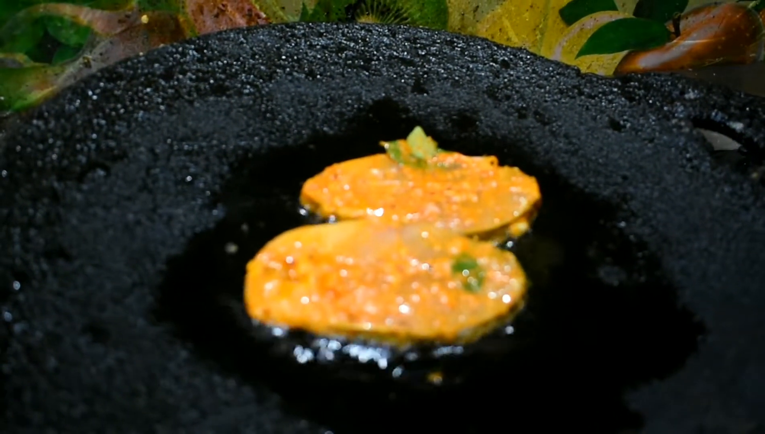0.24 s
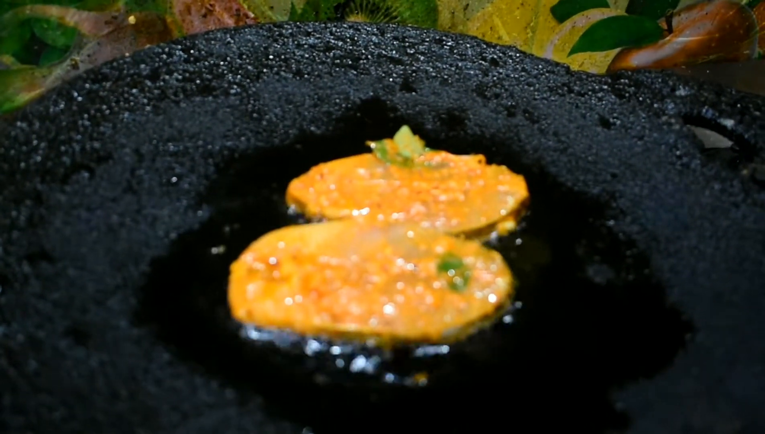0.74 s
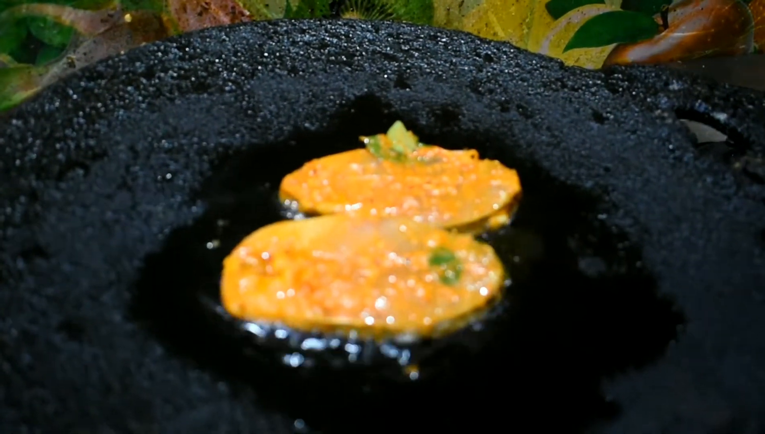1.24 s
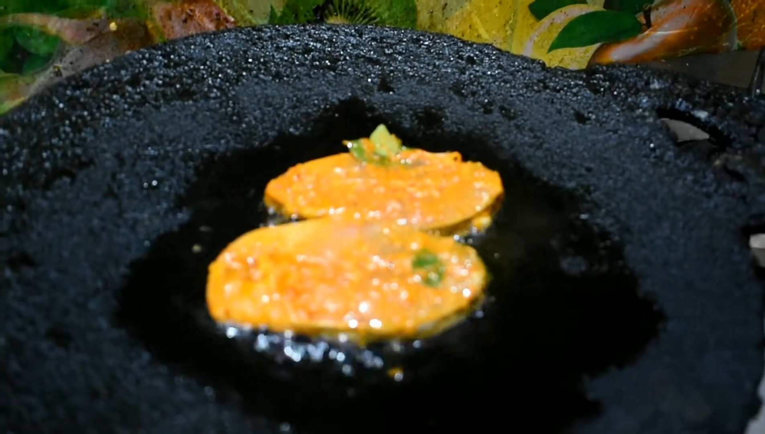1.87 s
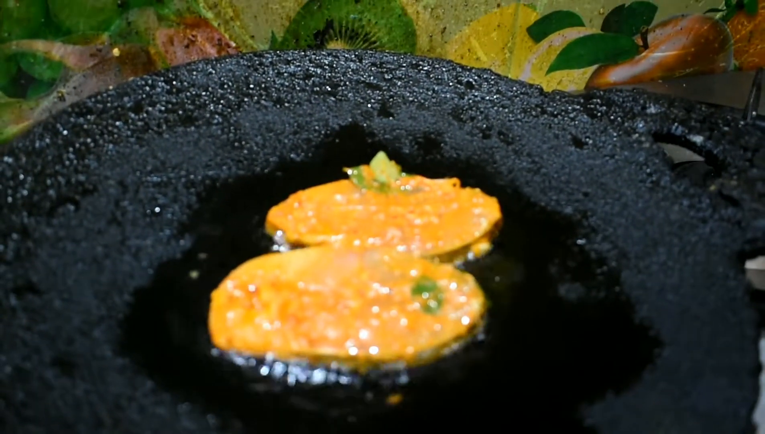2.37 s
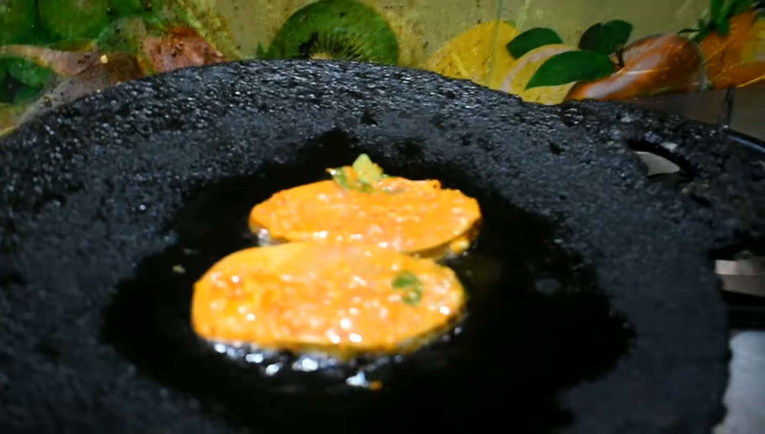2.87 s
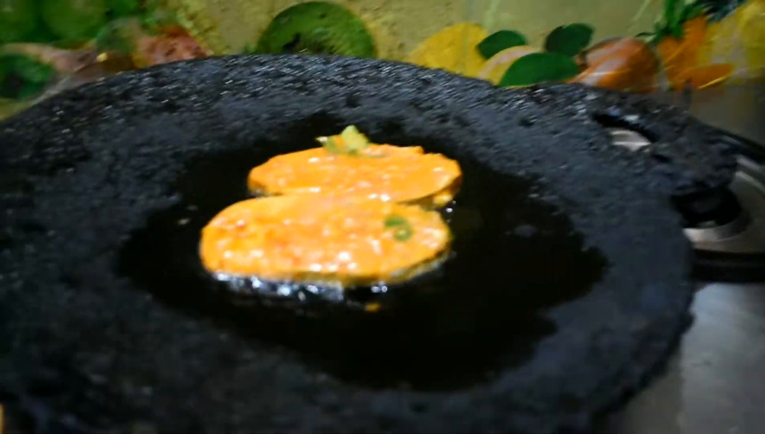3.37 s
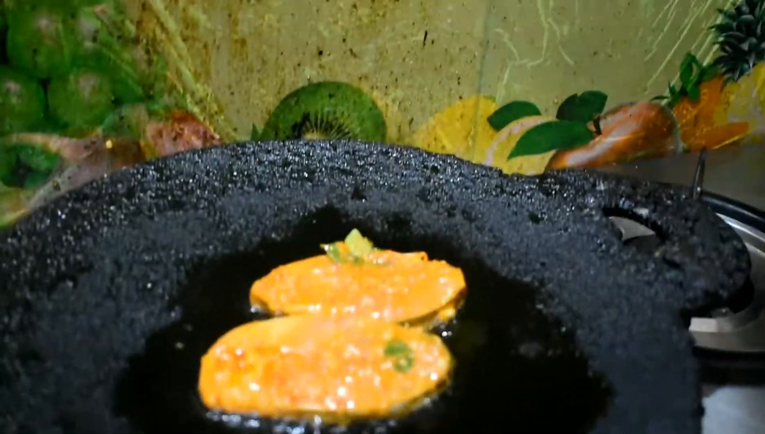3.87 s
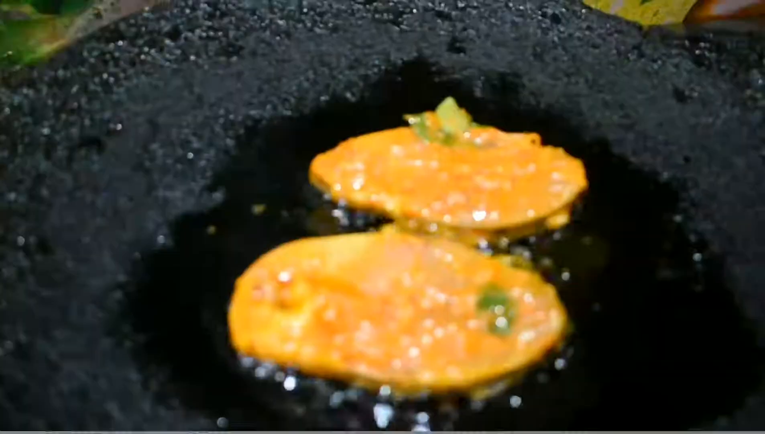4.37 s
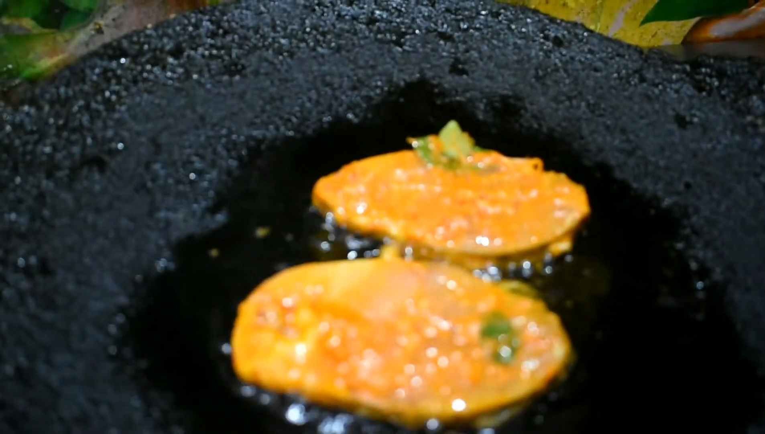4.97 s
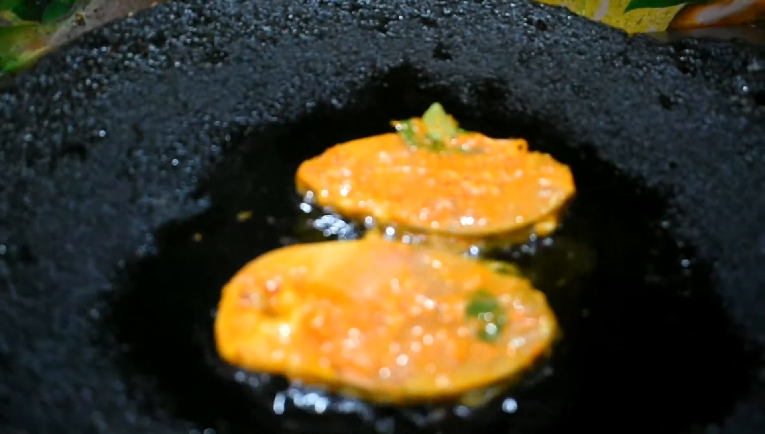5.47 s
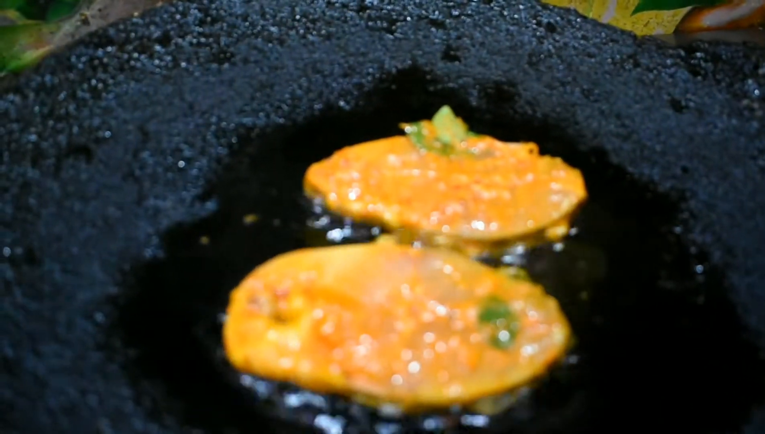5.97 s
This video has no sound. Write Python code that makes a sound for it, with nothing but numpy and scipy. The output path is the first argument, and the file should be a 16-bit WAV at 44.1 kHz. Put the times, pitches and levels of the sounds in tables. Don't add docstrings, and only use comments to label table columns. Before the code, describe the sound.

Close sizzling and crackling of fish frying in oil, with a hard spit and thump early on, then a cut to a fiercer, nearer fry.

```python
import sys
import numpy as np
from scipy import signal
from scipy.fft import rfft, irfft
from scipy.io import wavfile
from scipy.ndimage import minimum_filter1d

SR = 44100
rng = np.random.default_rng(int(sys.argv[2]) if len(sys.argv) > 2 else 0)


def to_wav(sig):
    pcm = np.clip(np.atleast_2d(sig), -1, 1) * 32767
    pcm = np.round(pcm).astype(np.int16)
    wavfile.write(sys.argv[1], SR, pcm.T)


def gain_from_db(level_db):
    decades = np.asarray(level_db, float) / 20
    return 10 ** decades


N = 274302
T = np.arange(N) / SR
TURN_S, CUT_S = 2.9, 4.436
NEAR = T > CUT_S


def rms_one(x):
    return x / np.sqrt(np.mean(x ** 2) + 1e-20)


def curve(x, table):
    return np.interp(x, *np.transpose(table))


def colour(x, spectrum):
    hz, db = np.transpose(spectrum)
    grid = np.fft.rfftfreq(4096, 1 / SR) + 1
    gain_db = np.interp(np.log(grid), np.log(hz), np.maximum(db, -70))
    cepstrum = irfft(np.log(gain_from_db(gain_db)))
    cepstrum[1:2048] *= 2
    cepstrum[2049:] = 0
    return signal.fftconvolve(x, irfft(np.exp(rfft(cepstrum))))[:N]


def resonance(x, hz, width_hz):
    r = np.exp(-np.pi * width_hz / SR)
    zeros = np.array([1, 0, -1]) * (1 - r * r) / 2
    return signal.lfilter(zeros, [1, -2 * r * np.cos(2 * np.pi * hz / SR), r * r], x)


def butter(x, order, hz, kind):
    return signal.sosfilt(signal.butter(order, hz, kind, fs=SR, output="sos"), x)


def drift(rate_hz):
    r = np.exp(-2 * np.pi * rate_hz / SR)
    return rms_one(signal.lfilter([1], [1, -2 * r, r * r], rng.standard_normal(N + SR))[SR:])


def between(start_s, length_s, edge_s):
    t = T - start_s
    return np.clip(np.minimum(t, length_s - t) / edge_s + .5, 0, 1)


def off_the_pan(x, lag_s, echo_db):
    lag = int(lag_s * SR)
    return x + gain_from_db(echo_db) * np.concatenate([np.zeros(lag), x[:-lag]])


def kitchen(x, wet_db, t60_s, count=8):
    t = np.arange(SR // 5) / SR
    tails = rng.standard_normal((count, len(t))) * gain_from_db(-60 * t / t60_s) * (t > .002)
    turn = (np.arange(N) / (.006 * SR)) % count
    wet = np.zeros(N)
    for k, tail in enumerate(tails):
        apart = np.abs((turn - k + count / 2) % count - count / 2)
        spot = x * np.cos(np.pi / 2 * np.minimum(apart, 1)) / np.sqrt(np.sum(tail ** 2))
        near, far = (signal.oaconvolve(spot * view, tail)[:N] for view in (NEAR, ~NEAR))
        wet += np.where(NEAR, near, far)
    return x + gain_from_db(wet_db) * wet


# start_s, length_s, rise_db
FLARES = [
    (2.84, 0.73, 12),
    (4.082, 0.27, 11.5),
]


def flame_level(fade_db):
    level_db = np.where(NEAR, -66, -70.5) + fade_db + 2.5 * drift(3)
    for start_s, length_s, rise_db in FLARES:
        level_db = level_db + rise_db * between(start_s, length_s, edge_s=0.08)
    return level_db


# pitch_hz, width_hz, level_db
BURNER = [(107.3, 27, -5), (131.2, 30, -6.5), (256, 45, -3.5), (320, 24, -8)]


def flame(level_db):
    noise = rng.standard_normal(N)
    murmur = sum(gain_from_db(db) * resonance(resonance(noise, hz, width), hz, 2 * width) for hz, width, db in BURNER)
    return gain_from_db(level_db) * rms_one(murmur)


# start_s, level_db
VIGOUR_FAR = [(0, -28.5), (0.25, -30.5), (1.2, -30.5), (1.5, -31), (2.1, -29.5), (2.8, -30.5), (3.2, -29),
              (3.9, -30), (4.43, -30)]
# start_s, level_db
VIGOUR_NEAR = [(4.44, -29.5), (4.95, -27), (5.2, -24), (5.55, -26), (5.85, -25), (6.22, -26.5)]


def vigour(fade_db):
    return curve(T, VIGOUR_FAR + VIGOUR_NEAR) + fade_db


def bubbles(per_s, spread_db, largest, sharpness, clump_db, lowest_hz, count=26):
    luck = rng.random(N)
    clumps = gain_from_db(clump_db * (drift(12) + .7 * drift(70)))
    born = luck < per_s * clumps / SR
    sizes = born * gain_from_db(spread_db * np.minimum(rng.exponential(1, N), largest)) * rng.choice([-1, 1], N)
    pitches = np.geomspace(lowest_hz, 16000, count)
    dealt = rng.choice(count, N, p=pitches / pitches.sum())
    lags = rng.uniform(.0007, .0011, count)
    out = np.zeros(N)
    for k, (hz, lag) in enumerate(zip(pitches, lags)):
        ring = resonance(sizes * (dealt == k) + 1e-18, hz, hz / sharpness)
        out += off_the_pan(ring, lag, -4)
    return rms_one(out)


# pitch_hz, level_db (per Hz)
OIL_COLOUR = [
    [(120, -22.5), (200, -18), (334, -10), (734, -7), (949, -5.5), (2050, -4.5), (2700, -3), (8700, -7),
     (11000, -11), (14500, -36), (15900, -37.5)],
    [(120, -58), (200, -21.5), (734, -7.5), (932, -5.5), (1500, -3), (2650, -1.5), (4180, -4), (8550, -6),
     (10100, -7), (14800, -29.5), (15900, -52)],
]
# pitch_hz, width_hz, level_db
PAN_MODES = [(955.5, 7.5, -12.5), (2670, 210, -31.5), (8240, 610, -41)]


def sizzle(level_db):
    hiss = rng.standard_normal(N) * gain_from_db(2.34 * drift(9.3) + 0.19 * drift(71))
    fizz = bubbles(per_s=5000, spread_db=4.0, largest=3.15, sharpness=2.8, clump_db=4.0, lowest_hz=301.8)
    crackle = bubbles(per_s=500, spread_db=6.0, largest=1.9, sharpness=3.0, clump_db=3.0, lowest_hz=1700)
    white = gain_from_db(-7) * hiss + gain_from_db(-5.0) * fizz + gain_from_db(1) * crackle
    white = white + sum(gain_from_db(db + 19.5) * resonance(white, hz, width) for hz, width, db in PAN_MODES)
    far, near = (rms_one(colour(white, view)) for view in OIL_COLOUR)
    oil = np.where(NEAR, near, far)
    top = butter(oil, 4, 11000, "high")
    top_db = np.where(NEAR, 2, np.where(T > TURN_S, -3, -1))
    return gain_from_db(level_db + 0.5) * (oil + (gain_from_db(top_db) - 1) * top)


def medium_bursts(level_db, count=600):
    when, keep, size, kind, tune = rng.random((count, 5)).T
    at = (when * (N - 1)).astype(int)
    start_s = when * N / SR
    here_db = level_db[at]
    small = kind < 0.75
    turned = small & (start_s > TURN_S) & (start_s < CUT_S)
    flurry_db = 5 * (drift(7)[at] - .3)
    per_s = 22 * gain_from_db(0.99 * (here_db + 30) + flurry_db) * np.where(turned, 1.8, 1)
    kept = keep * count * SR / N < per_s
    hz = np.where(small, 9240 * (1 + 0.43 * (tune - .5)), 4600 * (1 + 0.7 * (tune - .5)))
    db = here_db + 19.5 - 5 * size + 5.5 * turned - 6.5 * ~small
    audible = kept & (db > -100)
    return list(zip(start_s[audible], db[audible], hz[audible]))


# start_s, level_db (peak), pitch_hz
SNAPS_FAR = [(0.1033, -5, 8550), (0.4502, -4, 7400), (0.4928, -3, 5800), (0.5843, -7.5, 9040),
             (0.9261, -7.5, 8900), (1.0151, -7.5, 9200), (1.0486, -7.5, 6850), (1.1324, -3, 6100),
             (1.361, -8, 7040), (1.6626, 6, 8730), (1.6645, -2.5, 8550), (1.7266, -4.5, 10300),
             (2.0581, -3.5, 9700), (2.1677, -7, 10500), (2.4394, -3.5, 8400), (2.6395, -8.5, 7800),
             (2.8367, -3.5, 8900), (2.9778, -8, 10300), (3.4483, -8.5, 5370), (3.517, -6.5, 9330),
             (3.5918, -5.5, 9900), (3.6548, -2, 9200), (3.79, -7, 9200), (3.8122, -1, 8240),
             (3.9185, -5.5, 10340), (3.941, -3.5, 9860), (4.0087, -4.5, 9000), (4.143, -3.5, 8660),
             (4.3078, -5.5, 7900), (4.3954, -7, 8410)]
# start_s, level_db (peak), pitch_hz
SNAPS_NEAR = [(4.6968, -13.5, 7740), (4.7374, -8.5, 9150), (4.7911, -7, 7900), (4.833, -7.5, 8750),
              (4.85, -6, 9200), (4.9041, -5, 9750), (4.9766, -9, 10800), (4.9862, 0.5, 9340),
              (5.0008, -2.5, 6670), (5.1902, -7, 6500), (5.1408, 1, 7870), (5.154, -3, 6060),
              (5.2381, 1, 8450), (5.2618, -4, 7850), (5.286, -11, 7720), (5.3797, -0.5, 8540),
              (5.4674, -3.5, 6760), (5.5258, -2, 8370), (5.5778, -1, 7340), (5.5811, -4, 8160),
              (5.5842, 0.5, 6460), (5.6403, -3, 5900), (5.6792, -7, 7500), (5.777, -9.5, 7320),
              (5.79, -1.5, 7640), (5.8605, -7, 7940), (5.9995, -11, 8800), (6.035, -7, 8750),
              (6.1327, -2, 7900), (6.1346, -5.5, 9100)]
# start_s, level_db (peak), pitch_hz
POPS = [(0.0971, -7, 4200), (0.4084, -7.5, 5100), (0.7692, -14, 4100), (1.1628, -11.5, 2640),
        (1.1904, -16, 2850), (2.0072, -13.5, 4070), (2.1867, -14.5, 3300), (2.5362, -11, 3920),
        (2.9562, -13.5, 4310), (3.2349, -11, 4330), (3.2758, -10, 3040), (3.5207, -10, 4800),
        (3.26, -21, 4400), (3.824, -21, 3170), (3.846, -10, 4350), (4.4239, -7.5, 4600),
        (4.6228, -21, 4970), (4.918, -12.5, 2530), (4.9628, -17, 2670), (4.9887, -7.5, 3500),
        (5.14, -10, 3730), (5.144, -2.5, 5400), (5.438, -15, 2700), (5.573, -6, 3760), (5.6082, -1.5, 3860),
        (5.7748, -9.5, 4900), (6.03, -2.5, 4820), (6.0408, -10, 4800), (6.0876, -7.5, 6600),
        (6.1744, -6, 5000)]


def bursts(level_db, spray_db=-25, spray_t60_s=0.0062):
    rows = SNAPS_FAR + SNAPS_NEAR + POPS + medium_bursts(level_db)
    out, t = np.zeros(N + 900), np.arange(900) / SR
    chance, spray = rng.random((400, 4)), rng.standard_normal((400, 900))
    for (s, db, hz), (u, v, w, p), noise in zip(rows, chance, spray):
        ring_ms = 0.12 + 1000 * 2.1 / hz
        fade_s = .85 * max(ring_ms - .13, .06) / 1000
        ring = np.sin(2 * np.pi * hz * t * (1 + 0.01 * t / fade_s))
        ring *= (1 - np.exp(-t / 5e-5)) * np.exp(-t / fade_s)
        snap = gain_from_db(-2) * np.exp(-t / 6e-5) * np.sin(2 * np.pi * (6000 + 8000 * u) * t)
        pop = off_the_pan((ring + snap) * np.sign(p - .5), .0008 + .00022 * w, -2 - 5 * v)
        pop += gain_from_db(spray_db) * noise * gain_from_db(-60 * t / spray_t60_s)
        at = round(s * SR)
        out[at:at + len(t)] += gain_from_db(db + 5.5) * pop
    return butter(butter(out[:N], 2, 1300, "high"), 3, 12500, "low")


# start_s, level_db (peak), pitch_hz, length_cycles
SPITS = [(0.0972, -1, 7900, 1.9), (1.6626, -1, 6300, 22), (1.6630, -1, 11200, 22), (1.6635, -24, 690, 2.1),
         (1.675, -25, 1000, 5), (2.0818, -15, 2580, 9.5), (3.5578, -7, 2290, 9.1), (3.5582, -7.5, 3250, 19),
         (3.5755, -7, 1910, 1.9), (4.7, -8, 2300, 7.7), (4.4239, -7, 940, 1.9), (4.4241, -3, 3020, 11.4),
         (4.4248, -17.5, 304, 4.2), (5.0905, -6, 7300, 11)]
# start_s, level_db (peak)
JOLTS = [
    (0.1, -39),
    (1.6652, -16.5),
    (5.143, -29),
    (5.237, -38),
    (5.586, -26.5),
    (5.6114, -30.5),
]


def spits(jolt_s=0.00092):
    out, t = np.zeros(N + 2000), np.arange(2000) / SR
    for s, db, hz, cycles in SPITS:
        ring = -gain_from_db(db - 60 * t * hz / (2 * cycles)) * np.sin(2 * np.pi * hz * t)
        heard = (s + t < CUT_S) | (s > CUT_S)
        out[round(s * SR):][:len(t)] += heard * butter(ring, 2, hz / 2.5, "high")
    for s, db in JOLTS:
        out[round(s * SR):][:len(t)] -= gain_from_db(db) * np.sin(np.pi * np.minimum(t / jolt_s, 1)) ** 2
    return out[:N]


# start_s, level_db
SPLICE = [(5.03, 0), (5.06, -3), (5.095, -3), (5.099, -22), (5.1027, -22), (5.1042, 2), (5.16, 0)]


def scene():
    fade_db = NEAR * np.clip(-22.5 + 94.5 * np.maximum(T - CUT_S - 0.038, 0), None, 0)
    level_db = vigour(fade_db)
    flame_db = flame_level(fade_db)
    oil = kitchen(sizzle(level_db) + bursts(level_db), wet_db=-7.5, t60_s=0.16)
    mono = oil + spits() + flame(flame_db)
    far_end = np.clip((CUT_S - T) / 0.004, 0, 1)
    mono = mono * gain_from_db(curve(T, SPLICE)) * np.where(NEAR, 1, far_end)
    return np.array([mono, mono])


# pitch_hz, chance (0-1)
SWAP_CHANCE = [(4000, 0), (4500, .1), (6500, .07), (8300, .02), (10000, .12), (10800, .45), (11400, .8),
               (13000, .92), (15000, .9), (15900, .6)]
# start_s, end_s
SWAP_SPANS = [(0.03, 0.41), (0.47, 0.89), (0.95, 2.22), (2.32, 2.4), (2.49, 2.8), (2.86, 2.94), (3.0, 3.05),
              (3.11, 3.12), (3.46, 3.56), (3.69, 3.8), (4.07, 4.12), (4.23, 4.38), (4.44, 4.52),
              (4.58, 4.68), (4.86, 5.21), (5.27, 5.35), (5.41, 5.47), (5.6, 5.96), (6.04, 6.07),
              (6.16, 6.19)]


def patchy_bands(x, noise_db, kept_db, bass_step_db, top_step_db):
    window = np.sin(np.pi * (np.arange(2048) + .5) / 2048)
    frames = dict(fs=SR, window=window, nperseg=2048, noverlap=1024)
    hz, s, cells = signal.stft(x, **frames)
    fresh = signal.stft(rng.standard_normal(x.shape), **frames)[2]
    loudness = np.sqrt(np.mean(np.abs(cells[0]) ** 2, axis=0))
    mood = gain_from_db(3 * np.repeat(rng.standard_normal(len(s)), 3)[:len(s)])
    active = np.any([(s > a) & (s < b) for a, b in SWAP_SPANS], axis=0)
    edges = np.arange(4100, 17300, 690)
    luck = rng.random((len(edges), len(s)))
    luck = np.where(rng.random(luck.shape) < .5, np.roll(luck, 1, axis=1), luck)
    for low, high, draw in zip(edges, edges[1:], luck):
        band = (hz >= low) & (hz < high)
        swap = active & (draw < curve((low + high) / 2, SWAP_CHANCE))
        level, white = (np.sqrt(np.mean(np.abs(z[:, band]) ** 2, axis=1, keepdims=True))
                        for z in (cells, fresh))
        bed = minimum_filter1d(level, size=3, axis=2)
        mixed = gain_from_db(kept_db) * cells[:, band] + gain_from_db(noise_db) * fresh[:, band] * bed / white
        strong = level > gain_from_db(top_step_db) * mood * loudness
        cells[:, band] = np.where(swap, mixed, cells[:, band]) * strong
    bass = hz < 700
    cells[:, bass] *= np.abs(cells[:, bass]) > gain_from_db(bass_step_db) * mood * loudness
    return signal.istft(cells, **frames)[1][:, :N]


def top_cut(x):
    return signal.sosfilt(signal.butter(12, 16080, fs=SR, output="sos"), x)


def record(dry):
    patchy = patchy_bands(np.clip(dry, -1, 1), noise_db=-1.5, kept_db=-4.5, bass_step_db=-20, top_step_db=-26.0)
    return top_cut(np.clip(patchy, -1, 1))


dry = scene()
out = record(dry)
to_wav(out)
```